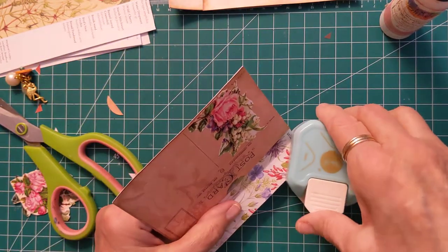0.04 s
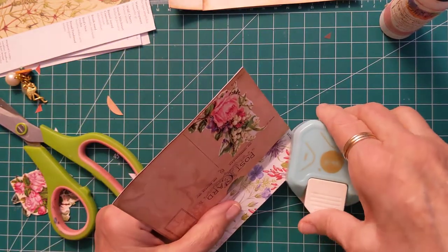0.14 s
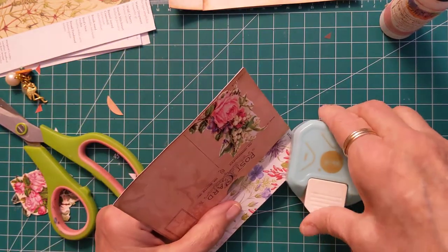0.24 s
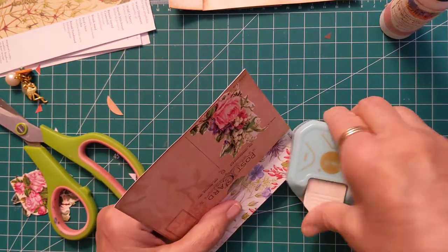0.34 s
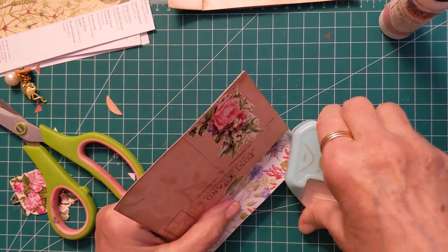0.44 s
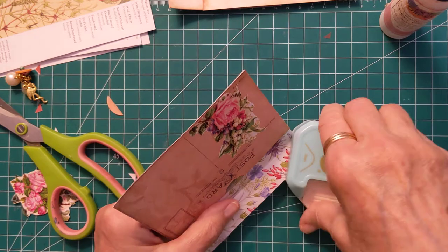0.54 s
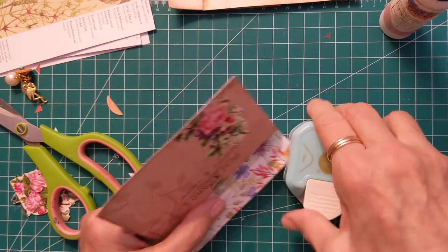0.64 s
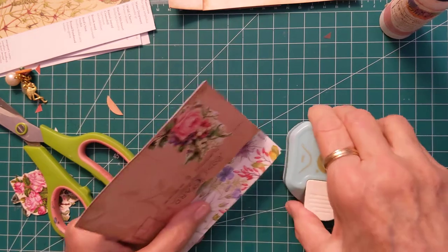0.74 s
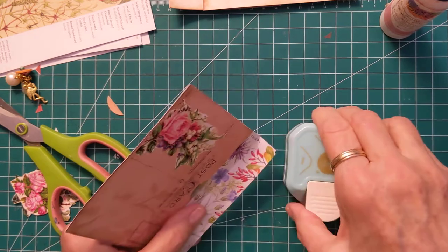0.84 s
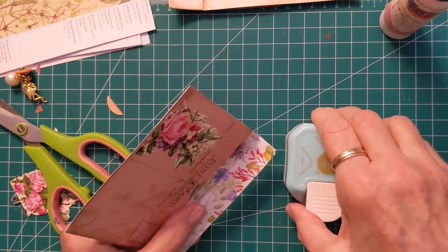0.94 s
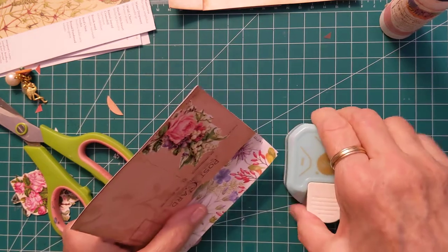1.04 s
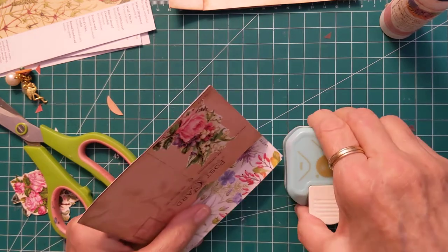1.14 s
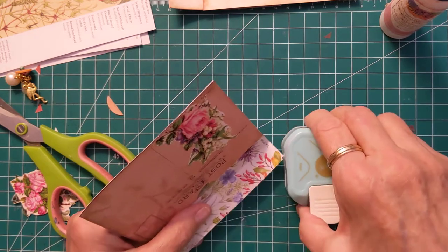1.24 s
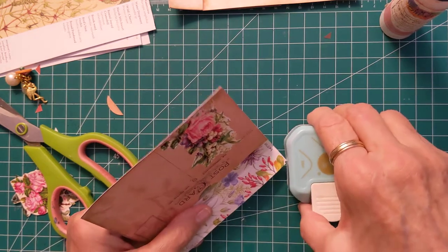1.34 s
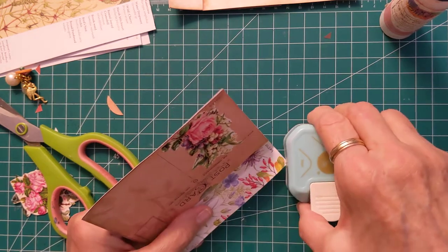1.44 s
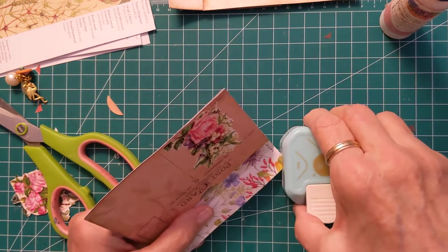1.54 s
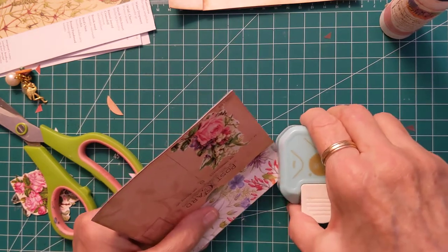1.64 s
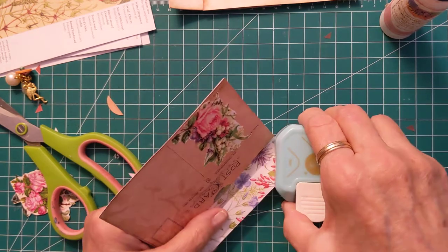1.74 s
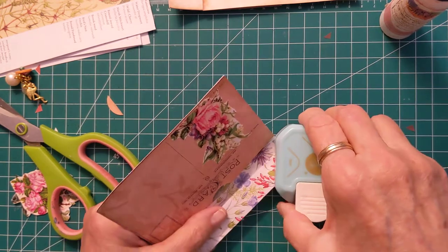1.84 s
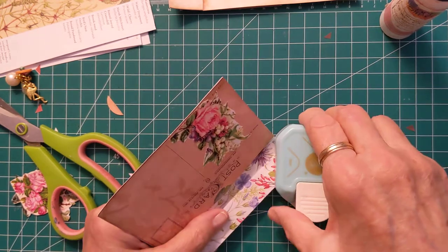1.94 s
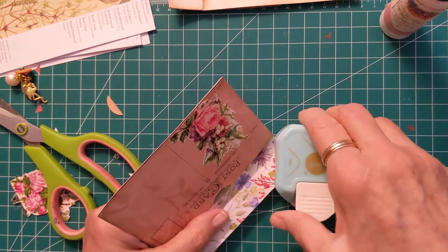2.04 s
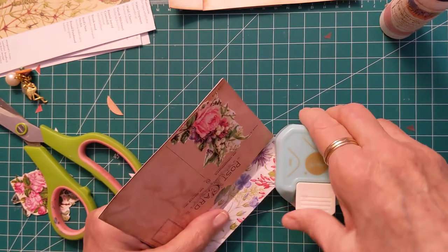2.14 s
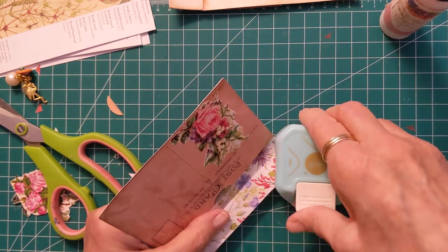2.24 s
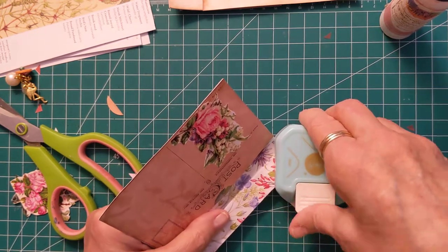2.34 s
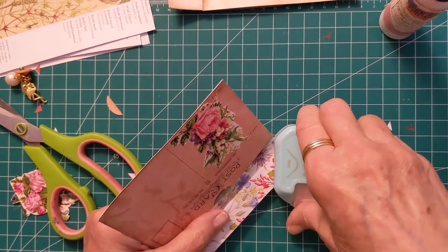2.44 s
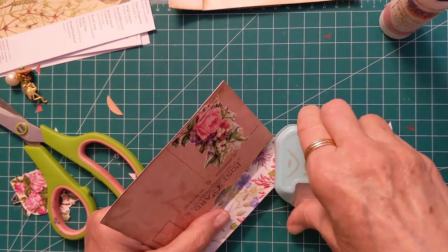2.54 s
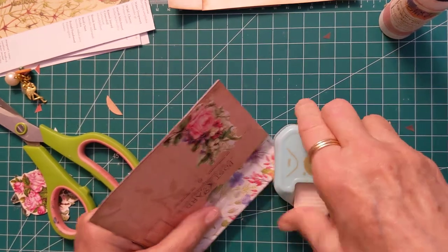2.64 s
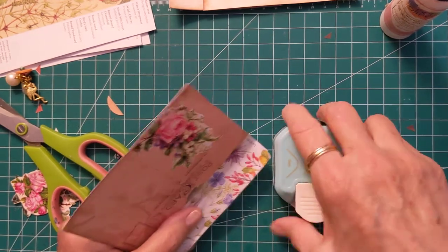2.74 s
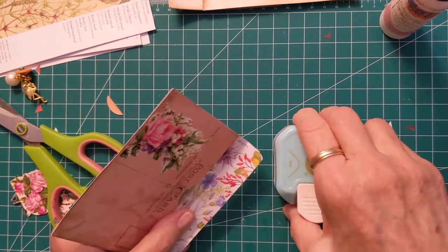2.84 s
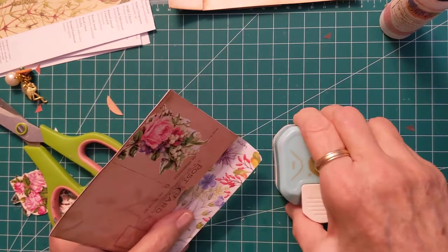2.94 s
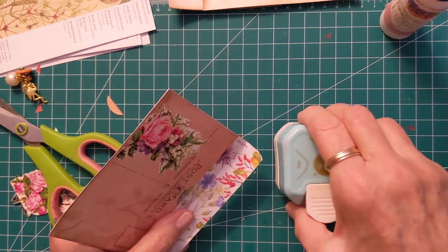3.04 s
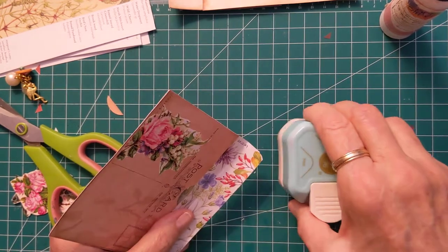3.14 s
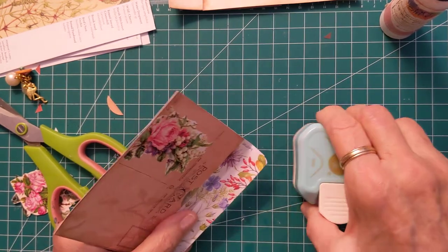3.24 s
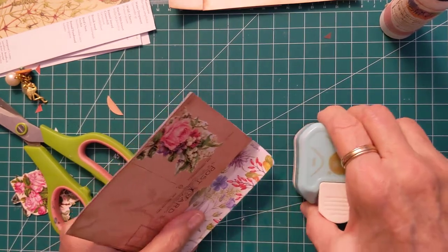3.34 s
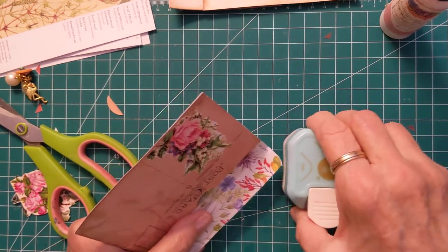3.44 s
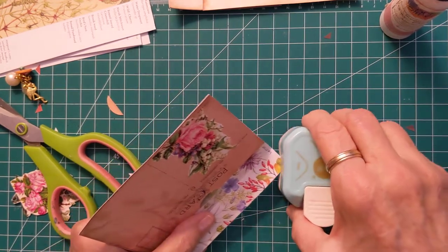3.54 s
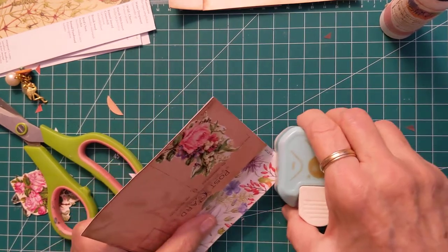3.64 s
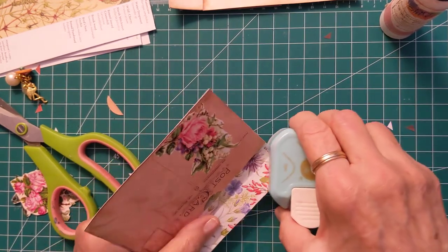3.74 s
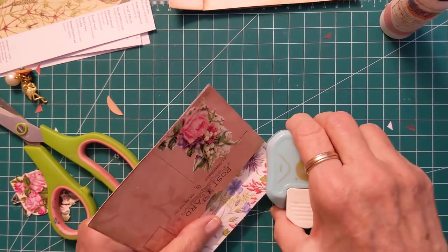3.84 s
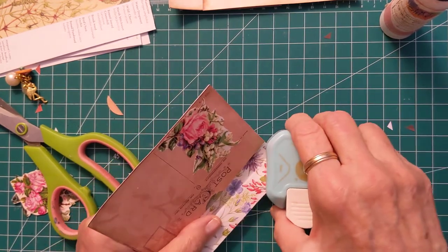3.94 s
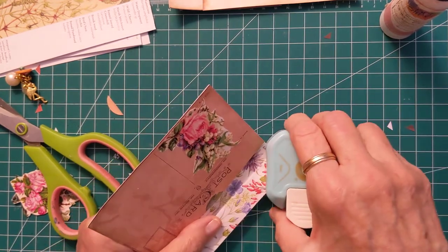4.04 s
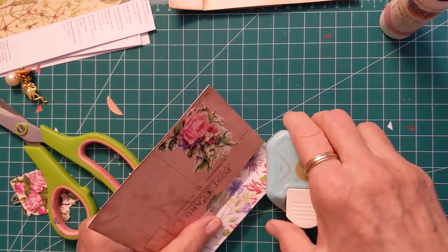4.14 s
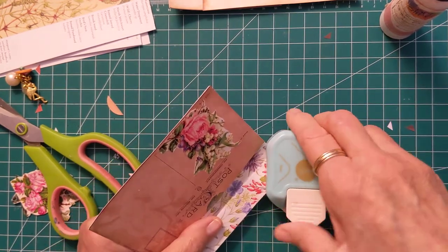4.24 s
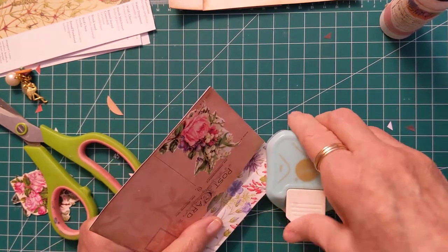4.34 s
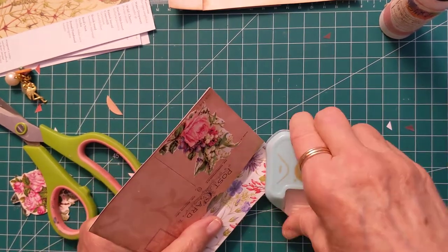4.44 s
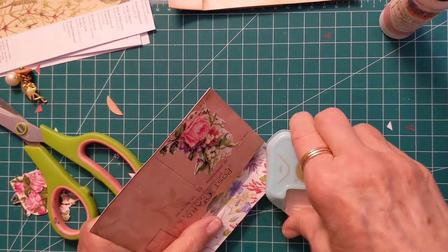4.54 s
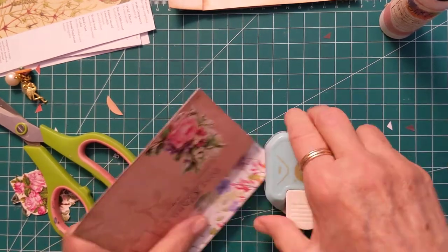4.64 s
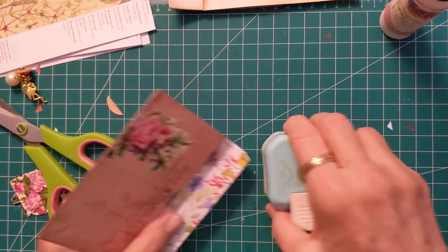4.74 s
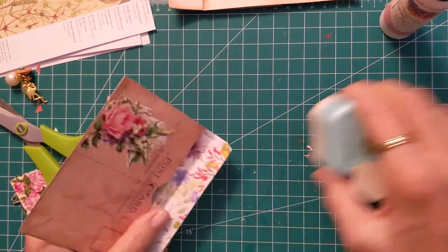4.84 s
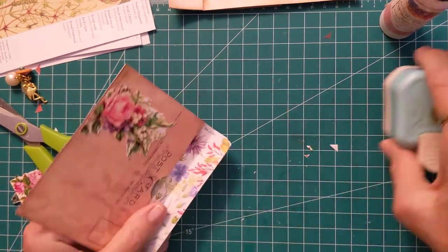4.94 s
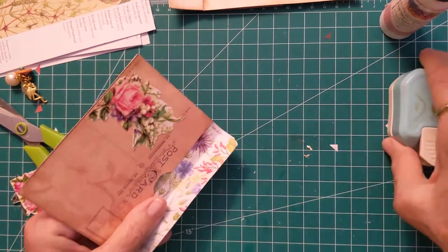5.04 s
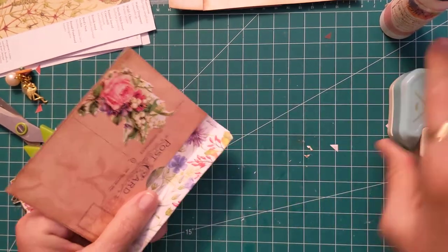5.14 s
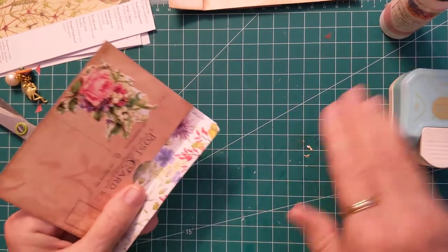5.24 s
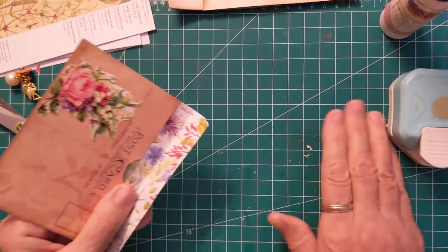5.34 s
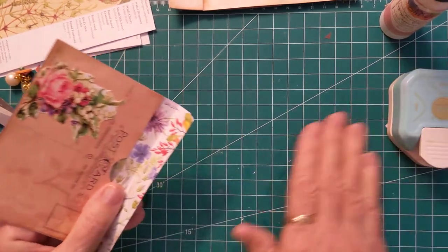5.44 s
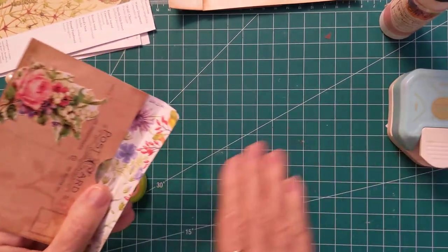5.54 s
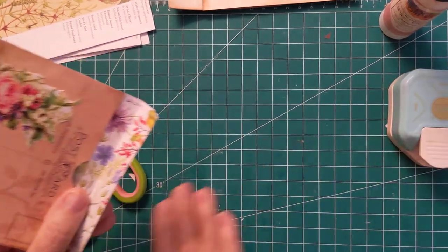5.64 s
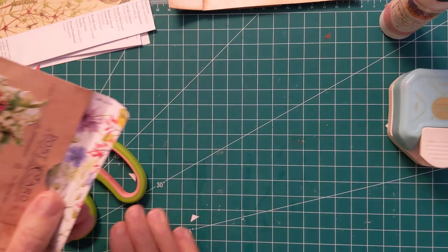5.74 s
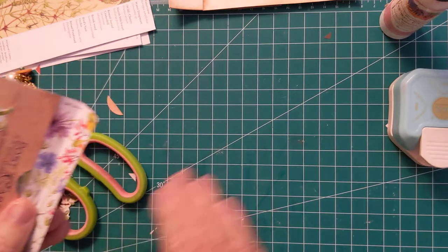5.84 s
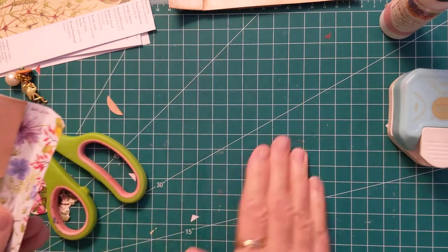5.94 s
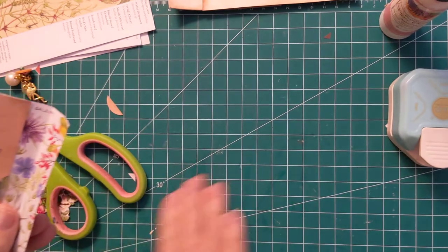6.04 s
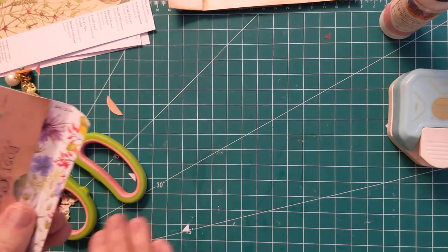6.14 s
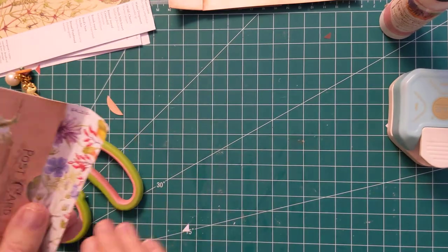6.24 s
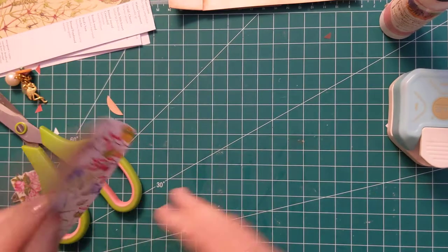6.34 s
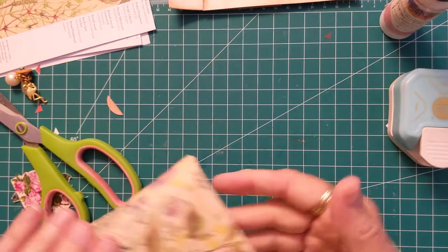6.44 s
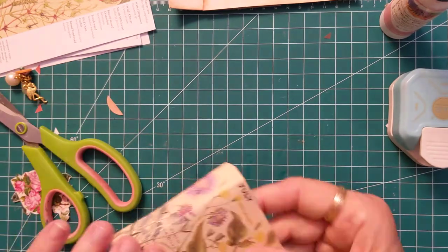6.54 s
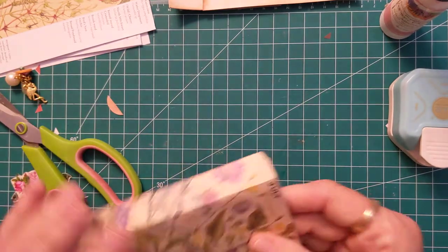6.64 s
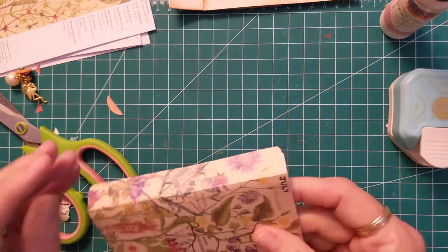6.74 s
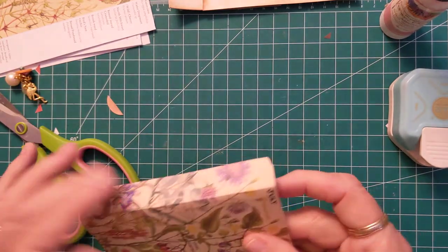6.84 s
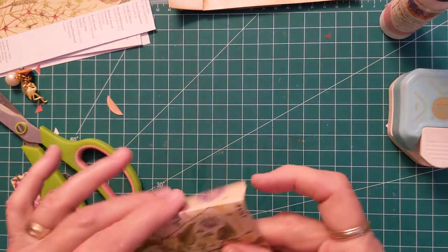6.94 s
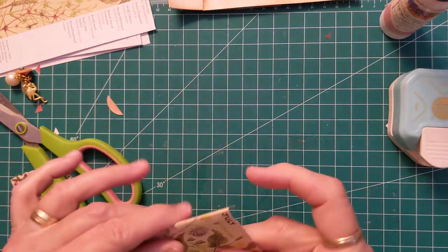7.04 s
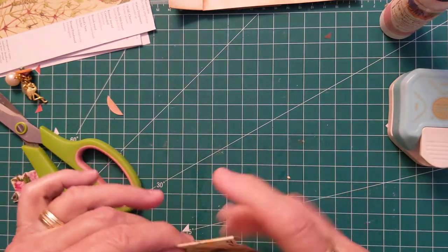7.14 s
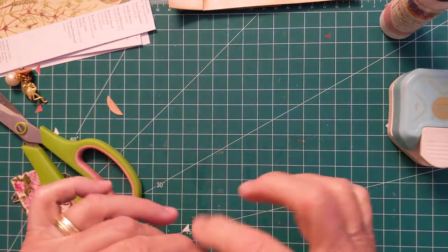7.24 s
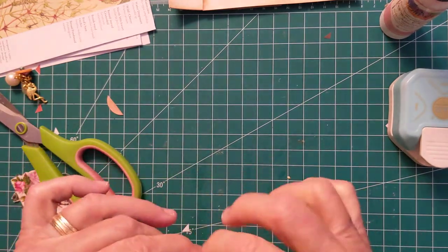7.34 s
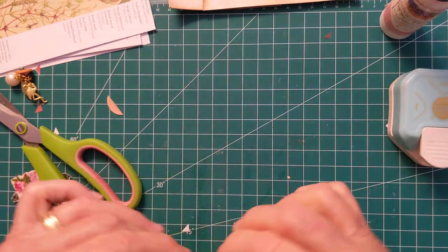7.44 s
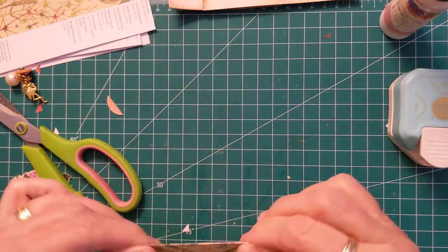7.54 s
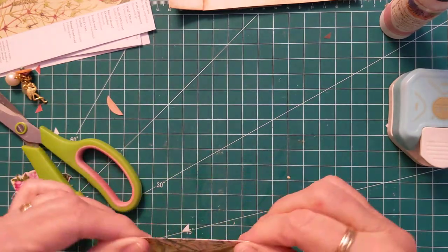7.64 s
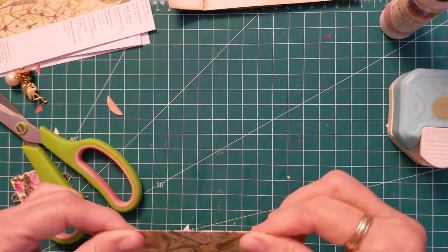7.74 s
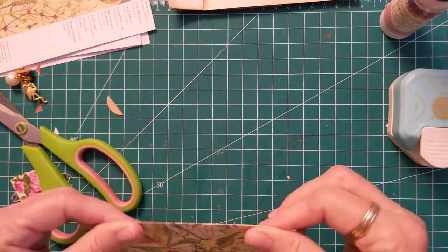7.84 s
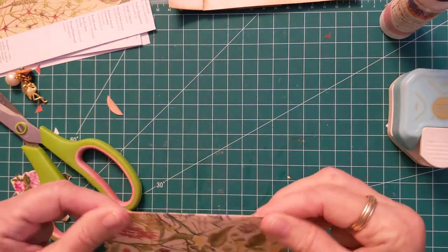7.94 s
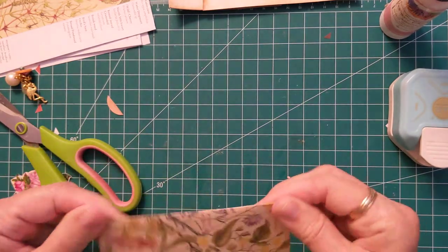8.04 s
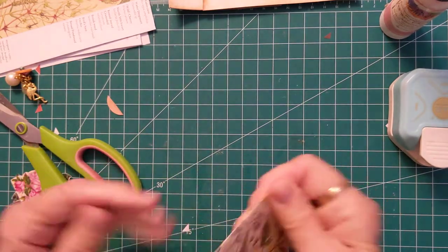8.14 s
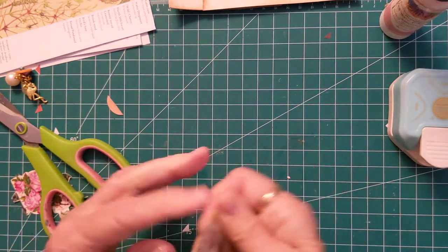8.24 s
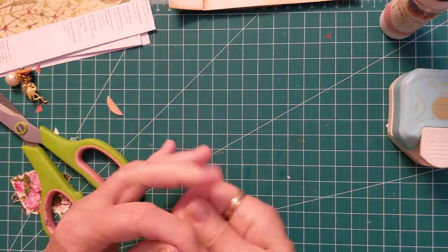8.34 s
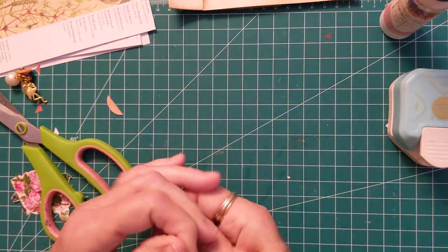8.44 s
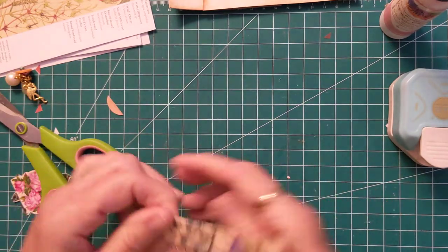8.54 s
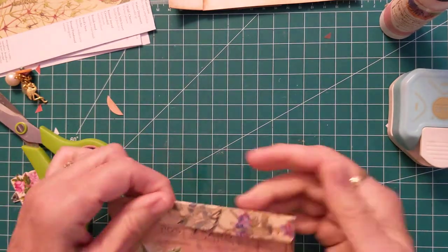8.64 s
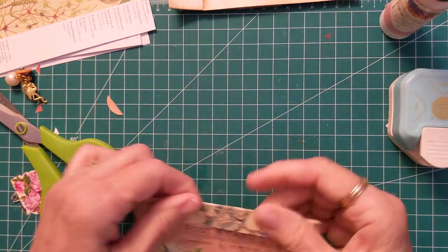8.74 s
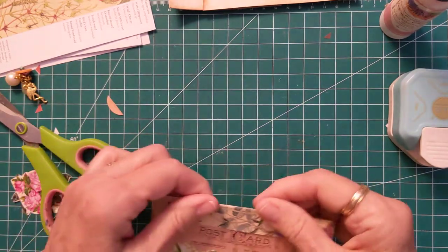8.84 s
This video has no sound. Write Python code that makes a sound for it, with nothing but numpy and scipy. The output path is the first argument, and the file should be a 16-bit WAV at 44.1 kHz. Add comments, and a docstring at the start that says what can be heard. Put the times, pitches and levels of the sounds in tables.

```python
"""A plastic corner punch rounds three corners of a thick card in a small room, over a faint steady whirr.
Each time the card drags in the slot, the blade crunches through its fibres and the lever snaps home.
Plastic parts click, the base rocks on the mat, the blade springs back and the card slips out.
Then the punch is put aside, a hand sweeps the scraps off the mat, and fingers flick and rub the card."""
import sys
import numpy as np
from scipy import signal
from scipy.fft import rfft, irfft, next_fast_len
from scipy.io import wavfile

SR = 44100
rng = np.random.default_rng(int(sys.argv[2]) if len(sys.argv) > 2 else 0)


def master(y):
    """Save y as 16-bit WAV."""
    cut = np.clip(np.atleast_2d(y).T, -1, 1)
    pcm = np.round(cut * 32767)  # scale
    wavfile.write(sys.argv[1], SR, pcm.astype(np.int16))


N = 391608
TIME = np.arange(N) / SR
AGE = np.arange(SR // 3) / SR   # seconds since a contact


def from_db(db):
    """Turn decibels into a gain."""
    return 10 ** (np.asarray(db) / 20)


def set_energy(x, seconds):
    """Give a sound the energy that an rms level of 1 has over this many seconds."""
    return x / np.sqrt(np.mean(np.sum(x ** 2, axis=-1)) / (seconds * SR) + 1e-20)


def add(out, start_s, sound):
    """Mix a sound in from its start time."""
    at = round(start_s * SR)
    out[:, at:at + sound.shape[-1]] += sound[..., :N - at]


def coloured(x, tone):
    """Shape a sound with a tone curve, whose rows are pitch_hz, level_db."""
    size = 2 * next_fast_len(x.shape[-1] // 2 + 2048)
    hz, db = np.transpose(sorted(tone))
    bins_hz = np.fft.rfftfreq(size, 1 / SR)
    gain = from_db(np.interp(np.log(bins_hz + 1), np.log(hz), db))
    # minimum phase: the filter never rings ahead of the sound
    cepstrum = irfft(np.log(gain))
    cepstrum[1:size // 2] *= 2
    cepstrum[size // 2 + 1:] = 0
    return irfft(rfft(x, size) * np.exp(rfft(cepstrum)))[..., :x.shape[-1]]


def filtered(x, order, hz, kind):
    """Keep the highs or one band of a sound."""
    return signal.sosfilt(signal.butter(order, hz, kind, fs=SR, output="sos"), x)


def panned(x, pan_db):
    """Make the left ear louder than the right by pan_db."""
    return x * from_db(np.array([[pan_db], [-pan_db]]) / 2)


def dying(t60):
    """A fade that loses 60 dB in t60 seconds."""
    return np.exp(-np.log(1000) * AGE / t60)


def swell(peak_s, rise_t60, fall_t60):
    """Strain builds up until peak_s, then lets go."""
    distance = np.maximum((peak_s - TIME) / rise_t60, (TIME - peak_s) / fall_t60)
    return from_db(-60 * np.minimum(distance, 2))


def strokes(rows, skew, power):
    """Each stroke gets louder and softer with the hand's speed; a skew under 1 peaks early."""
    level = np.zeros(N)
    for start_s, length_s, db in rows:
        during = (TIME > start_s) & (TIME < start_s + length_s)
        speed = np.sin(np.pi * ((TIME[during] - start_s) / length_s) ** skew)
        level[during] += from_db(db) * np.abs(speed) ** power
    return level


def grains(envelope, spread_db, apart_hz):
    """Many tiny contacts of uneven size; the ears differ mostly above apart_hz."""
    noise = rng.standard_normal((2, len(envelope)))
    mid, side = noise * from_db(spread_db * rng.standard_normal(len(envelope))) * envelope
    side = filtered(side, 1, apart_hz, "high")
    return np.array([mid + side, mid - side])


def ring(notes, ear_phase, rise_s, scatter_db=1.5):
    """A struck object's notes fade, a bit different each time; high ones reach the ears out of step."""
    out = 0
    for hz, db, t60 in notes:
        phase = ear_phase * hz / 1000 * rng.standard_normal() * np.array([[1], [-1]])
        gain = from_db(db + scatter_db * rng.standard_normal())
        out = out + gain * dying(t60) * np.cos(2 * np.pi * hz * AGE + phase)
    return out * (1 - np.exp(-(AGE / rise_s) ** 2))


def friction(level, tone, grain_db, pan_db):
    """Skin or paper catches on fine texture and makes a grainy hiss."""
    catches = np.interp(TIME, TIME[::64], rng.standard_normal(len(TIME[::64])))
    hiss = coloured(rng.standard_normal((2, N)) * from_db(grain_db * catches), tone)
    return panned(level * set_energy(hiss, N / SR), pan_db)


def clicks(contacts, tone, hard_t60, soft_t60, energy_s, ends_db, pan_db):
    """Strong contacts tick crisply, weak ones scuff a little longer; dull ones lie further left."""
    out = np.zeros((2, N))
    bands_hz = [(120, 1800), (1800, 7000), (7000, 17000)]
    for start_s, level_db, bright_db in contacts:
        t60 = np.interp(level_db, [-52, -40], [soft_t60, hard_t60])
        burst = coloured(grains(dying(t60), spread_db=2.0, apart_hz=4500), tone)
        levels_db = level_db + np.array([ends_db - bright_db, 0, ends_db + bright_db])
        tick = sum(from_db(db) * set_energy(filtered(burst, 3, hz, "band"), energy_s)
                   for db, hz in zip(levels_db, bands_hz))
        add(out, start_s, panned(tick, pan_db - 0.24 * bright_db))
    return out


# Tone of the whirr that both ears share: pitch_hz, level_db
SHARED_WHIRR_TONE = [(20, -7), (41, 5), (65, -5.5), (160, -6), (260, -16), (400, -16.5), (800, -15.5),
                     (1020, -8.5), (1210, -17.5), (1390, -7), (1650, -19.5), (1920, -11.5), (2130, -20),
                     (2400, -17.5)]
# Tone of the whirr that is opposite in the two ears: pitch_hz, level_db
SIDE_WHIRR_TONE = [(20, -17), (41, -26), (80, -23), (350, -28.5), (720, -21), (860, -13.5), (1180, -16.5),
                   (1290, -14.5), (1390, -15.5), (1470, -18), (1630, -13), (1950, -18.5), (2250, -22),
                   (2400, -20)]
# Tone of the hiss on top of both: pitch_hz, level_db
HISS_TONE = [(2700, -20.5), (4000, -22.5), (6000, -29), (7500, -33), (10500, -29.5), (13000, -36),
             (16000, -39.5)]
def whirr(level_db=-54):
    """Air rushes steadily, as from a small fan."""
    mid = coloured(rng.standard_normal(N), SHARED_WHIRR_TONE + HISS_TONE)
    side = from_db(0.1) * coloured(rng.standard_normal(N), SIDE_WHIRR_TONE + HISS_TONE)
    ears = np.array([mid + side, mid - side]) / np.std(mid)
    return panned(from_db(level_db) * ears, pan_db=1.05)


# Short scrapes of card and plastic: start_s, length_s, level_db
SCRAPES = [(0.355, 0.045, -58.5), (1.70, 0.13, -56.5), (2.425, 0.045, -46), (5.064, 0.033, -42.5),
           (6.96, 0.14, -56.5)]
# Tone of a scrape: pitch_hz, level_db
SCRAPE_TONE = [(100, -6), (400, -7), (1000, 1), (2000, -0.5), (4500, -5), (7500, -12.5), (11000, -4.5),
               (16000, -16)]
def scrapes():
    """Card and plastic drag against the punch and the mat."""
    return friction(strokes(SCRAPES, skew=0.99, power=0.66), SCRAPE_TONE, grain_db=4.0, pan_db=-1.0)


# The three cuts: snap_s, build_up_s, tear_db, crack_db, housing_db, thud_db
CORNER_CUTS = [(0.4181, 0.0086, -17.5, -23.5, -23, -32.5), (2.471, 0.048, -25.5, -20, -18, -33.5),
               (4.4695, 0.021, -26, -20.5, -21, -33.5)]
# Tone of tearing fibres: pitch_hz, level_db
TEAR_TONE = [(80, -6.5), (320, 9.5), (540, -5), (750, 7), (1050, 3.5), (1600, 1.5), (2350, 6), (2800, -0.5),
             (3900, -1), (4600, 8.5), (5600, -3), (6900, -11.5), (10000, -2.5), (13500, -8), (16000, -12)]
# Tone of the lever hitting its stop: pitch_hz, level_db
LEVER_TONE = [(50, -6), (250, -2.5), (550, -10.5), (1000, -5.5), (1650, 3.5), (2300, 0.5), (2900, -6.5),
              (4700, -5.5), (6500, -12), (11000, -8.5), (16000, -8.5)]
# Notes of the table under the mat: pitch_hz, level_db, fade_s
TABLE_NOTES = [(108.4, 0, .11), (174, 2.5, 0.07), (223, 3.5, 0.058), (280, -4.5, 0.086), (419, -7, 0.067)]
# Notes of the punch's plastic housing: pitch_hz, level_db, fade_s
HOUSING_NOTES = [(725, -14.5, 0.062), (1150, -23, 0.018), (1495, -3, 0.058), (1606, 7.5, 0.021),
                 (1766, -0.5, 0.034), (1857, -15, 0.051), (1930, -27, .05), (2424, -13, 0.042),
                 (3610, -12, 0.025), (3810, -18, 0.024), (4340, -27, 0.025), (4460, -5, 0.02),
                 (4620, -10, 0.016), (5200, -8, 0.016), (5760, -9, 0.022)]
def punch(tear_lead_s=0.0047, push_db=-19):
    """Fibres break in a short crunch that shakes the table, then the lever hits its stop."""
    tearing = sum(from_db(db) * swell(snap_s - tear_lead_s, build_s, fall_t60=0.043)
                  for snap_s, build_s, db, *_ in CORNER_CUTS)
    out = panned(coloured(grains(tearing, spread_db=0.5, apart_hz=5000), TEAR_TONE), pan_db=1.7)
    for snap_s, _, tear_db, crack_db, housing_db, thud_db in CORNER_CUTS:
        shake = rng.choice([-1, 1]) * ring(TABLE_NOTES, ear_phase=0.3, rise_s=0.0025)
        crack = coloured(grains(dying(0.015), spread_db=6.5, apart_hz=5000), LEVER_TONE)
        housing = ring(HOUSING_NOTES, ear_phase=0.062, rise_s=0.0013)
        thud = ring(TABLE_NOTES, ear_phase=0.3, rise_s=0.00079)
        add(out, snap_s - tear_lead_s, from_db(tear_db + push_db) * shake)
        add(out, snap_s, panned(from_db(crack_db) * set_energy(crack, 0.0062), pan_db=-3.5))
        add(out, snap_s, panned(from_db(housing_db) * housing, pan_db=3.5))
        add(out, snap_s, panned(from_db(thud_db) * thud, pan_db=2.5))
    return out


# Light touches in the punch: start_s, level_db, bright_db
PLASTIC_TOUCHES = [(0.543, -59, -7), (0.608, -47, -1), (1.382, -51, -10), (1.783, -47.5, -12),
                   (2.426, -45.5, 0.5), (2.689, -52.5, 4), (2.781, -49.5, 1), (2.792, -50.5, -3),
                   (3.545, -55.5, -7), (3.835, -52, -5), (3.860, -52, -10.5), (3.891, -57, 4),
                   (4.648, -43, 2.5), (4.744, -50.5, -8.5), (4.756, -51.5, 2)]
# Tone of a plastic click: pitch_hz, level_db
PLASTIC_TONE = [(100, -20.5), (500, -10), (800, -2.5), (1300, 1.5), (2000, -1), (3700, 7), (5300, 0.5),
                (7500, -14), (11000, -1.5), (16000, -15.5)]
def plastic_clicks():
    """Plastic parts and the card's corner tick as they touch."""
    return clicks(PLASTIC_TOUCHES, PLASTIC_TONE, hard_t60=0.018, soft_t60=0.02,
                  energy_s=0.0096, ends_db=-5.0, pan_db=2.0)


# The base and the card bump the mat: start_s, pitch_hz, level_db, thud_db
MAT_KNOCKS = [(0.6262, 950, -42, -56), (0.691, 910, -29.5, -43.5), (1.7832, 1160, -40, -64),
              (2.773, 930, -26.5, -39), (3.834, 1930, -32, -62), (3.904, 850, -37.5, -53.5),
              (4.6814, 1010, -25.5, -50), (4.692, 930, -35, -52), (4.821, 910, -44, -68),
              (4.84, 920, -42.5, -66), (5.0664, 770, -36, -48.5), (5.0833, 1030, -22.5, -50),
              (5.096, 1250, -34, -56), (6.572, 714, -45, -59), (6.935, 775, -42, -64),
              (8.142, 620, -34, -55.5)]
def knocks(cycles=3.56):
    """The mat stops each knock within a few cycles; the table hums on below."""
    out = np.zeros((2, N))
    for start_s, hz, db, thud_db in MAT_KNOCKS:
        progress = 4 * AGE * hz / cycles
        knock = (progress * np.exp(1 - progress)) ** 2 * np.sin(2 * np.pi * hz * AGE)
        thud = ring(TABLE_NOTES, ear_phase=0.63, rise_s=0.00061, scatter_db=4.0)
        add(out, start_s, from_db(db) * knock + from_db(thud_db) * thud)
    return panned(out, pan_db=2.5)


# The lever is let go: start_s, click_db, bright_db, slip_db
LEVER_RELEASES = [(0.664, -34.5, 2.5, -59), (2.745, -34.5, 3, -61), (4.682, -32.5, 4, -59)]
# Tone of sliding card: pitch_hz, level_db
CARD_TONE = [(500, -5), (1500, -3), (3000, -3), (5500, -4.5), (7300, -7), (9000, 0), (10500, 4), (13000, 1),
             (15000, -1.5), (16500, -13)]
def spring_back(drag_db=-45, drag_lead_s=0.0032, jolt_db=-48.5, slip_s=0.17):
    """The spring drags the blade back until it clicks free and jolts the table; the card slips out."""
    out = clicks([row[:3] for row in LEVER_RELEASES], PLASTIC_TONE, hard_t60=0.019, soft_t60=0.025,
                 energy_s=0.0086, ends_db=-2, pan_db=3.3)
    dragging = np.zeros(N)
    for start_s, *_ in LEVER_RELEASES:
        dragging += from_db(drag_db) * swell(start_s - drag_lead_s, rise_t60=0.19, fall_t60=0.071)
        add(out, start_s, from_db(jolt_db) * ring(TABLE_NOTES, ear_phase=0.5, rise_s=0.0007))
    out += friction(dragging, SCRAPE_TONE, grain_db=4.5, pan_db=0.0)
    slips = [(start_s, slip_s, db) for start_s, _, _, db in LEVER_RELEASES]
    return out + friction(strokes(slips, skew=0.33, power=1.5), CARD_TONE, grain_db=2.0, pan_db=-8.0)


# Sweeps of the hand: start_s, length_s, relative_level_db
HAND_SWEEPS = [(5.38, 0.073, -62), (5.43, 0.42, -43.5), (6.016, 0.26, -41), (7.44, 0.23, -47)]
# Tone of sliding skin: pitch_hz, level_db
SKIN_TONE = [(500, -23), (1500, -10.5), (2700, -11.5), (5500, -10), (7500, -11.5), (9000, -4.5),
             (10000, 0.5), (12500, -0.5), (14500, -5), (16000, -10)]
def hand_sweeps(gain_db=2.5):
    """Skin hisses over the mat, then along the card."""
    level = from_db(gain_db) * strokes(HAND_SWEEPS, skew=0.74, power=1.18)
    return friction(level, SKIN_TONE, grain_db=1.0, pan_db=-1.0)


# Fingertips flick the card: start_s, level_db, bright_db
EDGE_FLICKS = [(6.571, -55, 0), (6.630, -49, 6.5), (6.738, -46, 0), (8.138, -42.5, 3.5), (8.529, -51.5, 9),
               (8.831, -47.5, 1.5)]
# Tone of a flick: pitch_hz, level_db
EDGE_TONE = [(100, -18), (380, -22.5), (560, 5.5), (900, 8.5), (1500, -5.5), (3000, -6), (4000, -1.5),
             (4750, -5), (5800, -3), (7500, -4.5), (11500, 7), (16000, 1)]
# Notes of the card's edge: pitch_hz, level_over_flick_db, fade_s
EDGE_NOTES = [(1100, -2.5, 0.033), (4760, 4, 0.017)]
def card_flicks():
    """Each flick ticks and makes the card's stiff edge ring briefly."""
    out = clicks(EDGE_FLICKS, EDGE_TONE, hard_t60=0.028, soft_t60=0.035,
                 energy_s=0.0055, ends_db=0.2, pan_db=2.5)
    for start_s, db, _ in EDGE_FLICKS:
        add(out, start_s, from_db(db) * ring(EDGE_NOTES, ear_phase=0.13, rise_s=0.00064))
    return out


# Strokes of the fingers: start_s, length_s, relative_level_db
FINGER_RUBS = [(6.67, 0.083, -48), (6.925, 0.19, -48), (7.105, .06, -52.5), (7.16, .036, -55),
               (7.268, 0.069, -50), (7.33, 0.15, -60), (7.705, 0.13, -53.5), (7.9, 0.2, -56),
               (8.07, 0.16, -54), (8.12, .035, -48.5), (8.505, 0.056, -47.5), (8.825, 0.062, -52.5)]
def finger_rubs(gain_db=-1.3):
    """Fingers and card slide over each other with a soft hiss."""
    level = from_db(gain_db) * strokes(FINGER_RUBS, skew=0.66, power=1.05)
    return friction(level, CARD_TONE, grain_db=1.5, pan_db=-1.0)


# Tone of the room's echoes: pitch_hz, level_db
ECHO_TONE = [(80, -4.5), (300, -1), (800, -1.5), (1600, -1), (4000, 1), (7000, -2.5), (11000, -2.5),
             (16000, -7)]
def room(x, t60=0.2, tail_start_s=0.0079, echo_s=0.0092):
    """A furnished room answers with one near echo and a short wash of fainter ones."""
    tail = grains(dying(t60) * (AGE > tail_start_s), spread_db=-0.5, apart_hz=700)
    answer = from_db(-11) * set_energy(tail, 1 / SR)
    at = round(echo_s * SR)
    answer[[0, 1], [at, at + 4]] += from_db(-14)   # the echo reaches the right ear just after the left
    return signal.fftconvolve(x, coloured(answer, ECHO_TONE), axes=-1)[:, :N]


def scene():
    """Everything on the table sounds into the room, over the whirr."""
    air = whirr()
    punching = scrapes() + punch() + plastic_clicks() + knocks() + spring_back()
    handling = hand_sweeps() + card_flicks() + finger_rubs()
    table = filtered(punching + handling, 2, 65, "high")   # the table top gives off little deep bass
    return air + table + room(table)


def record(dry, cutoff_hz=15750):
    """Cut off the highest treble steeply."""
    return signal.sosfilt(signal.ellip(10, .2, 80, cutoff_hz, fs=SR, output="sos"), dry)


dry = scene()
out = record(dry)
master(out)
```